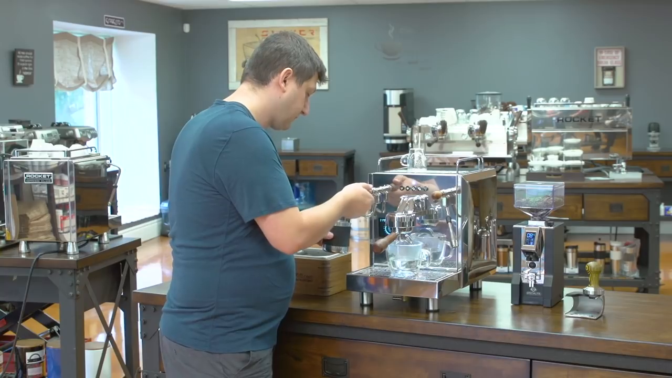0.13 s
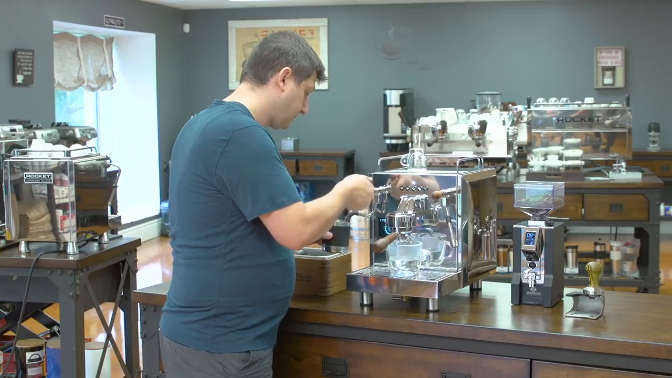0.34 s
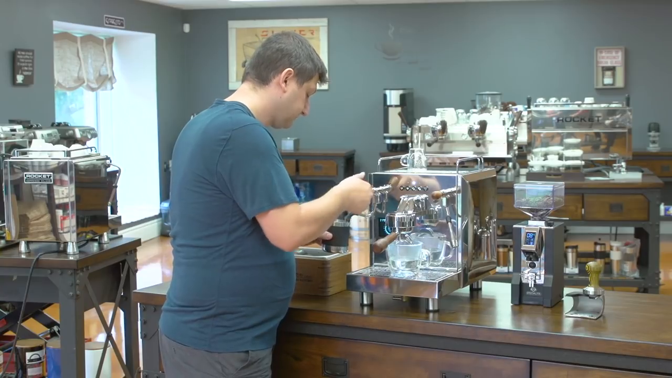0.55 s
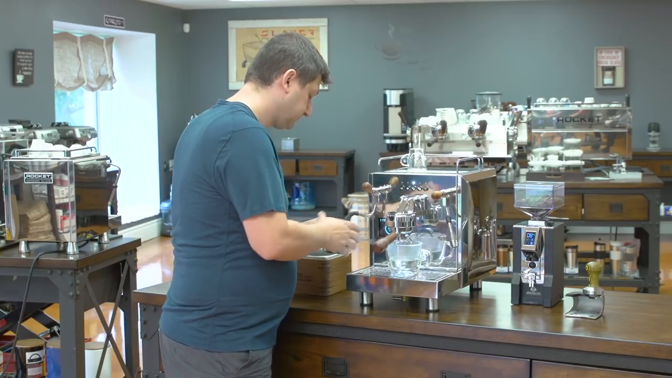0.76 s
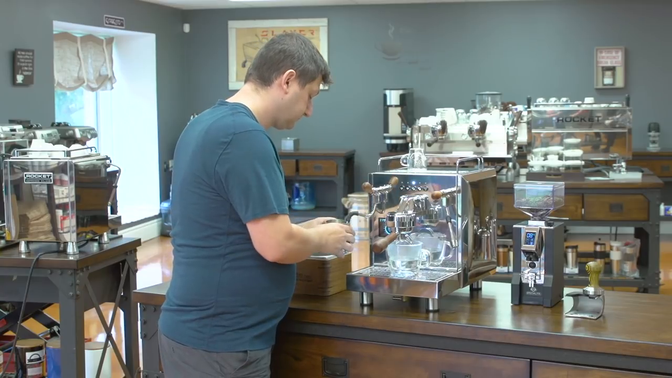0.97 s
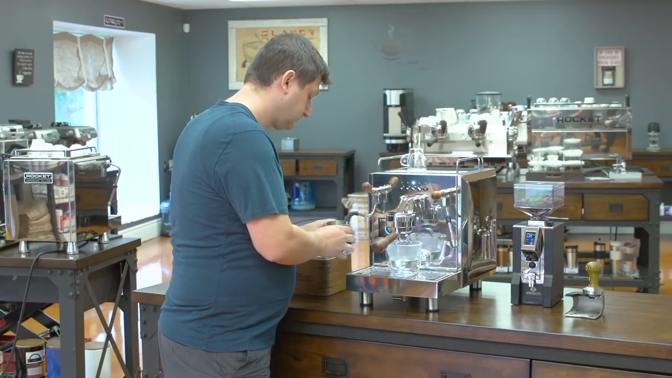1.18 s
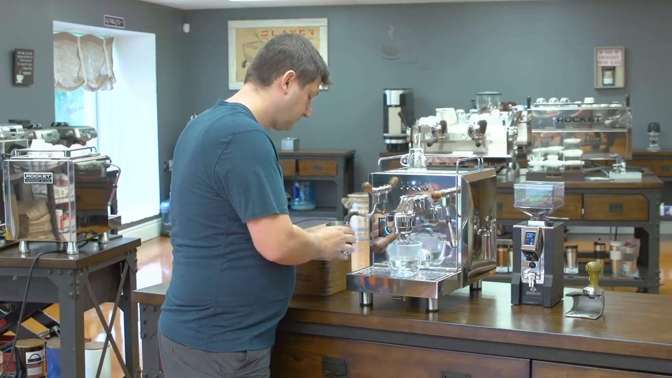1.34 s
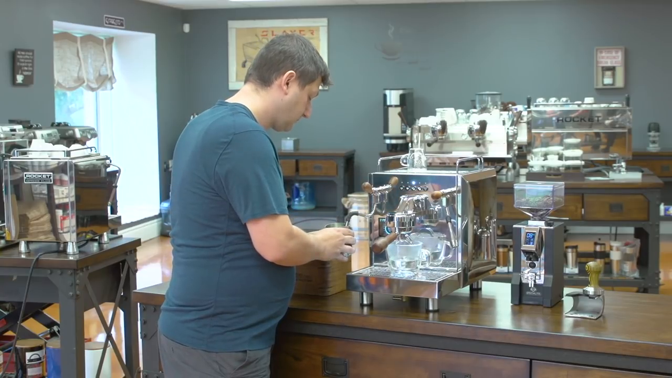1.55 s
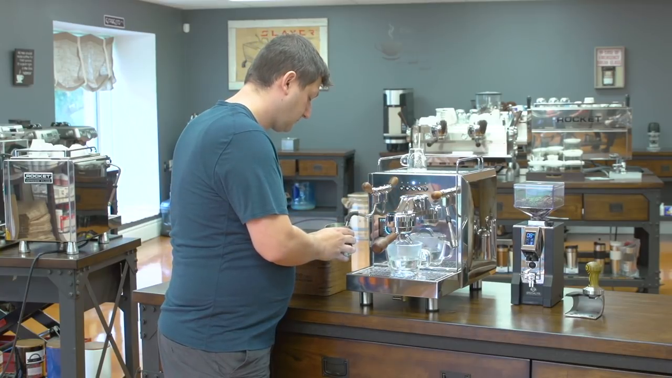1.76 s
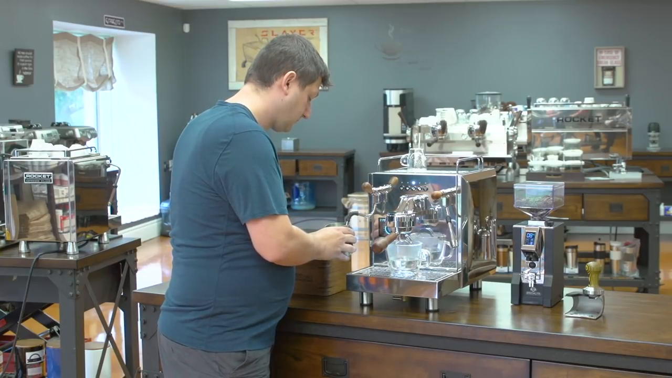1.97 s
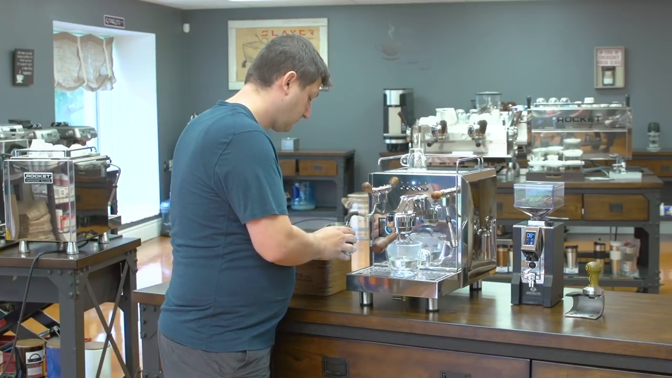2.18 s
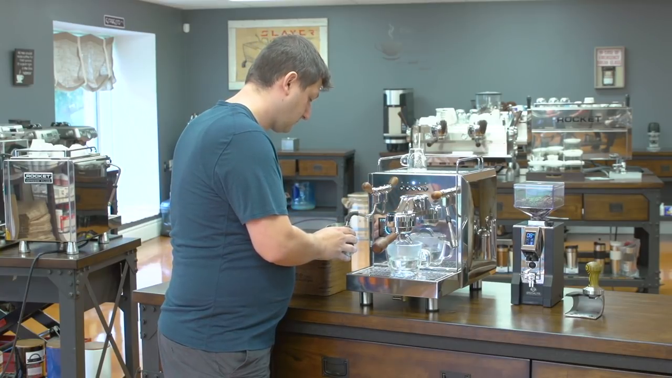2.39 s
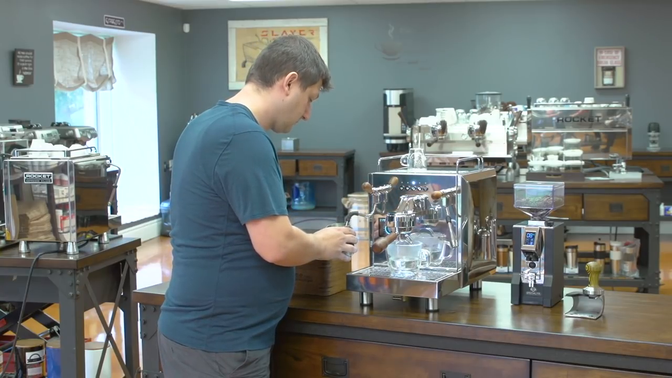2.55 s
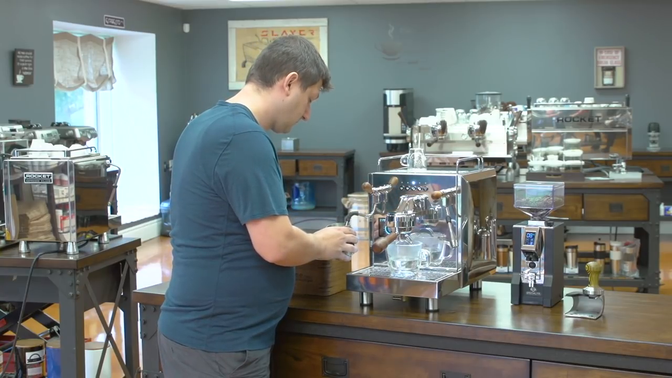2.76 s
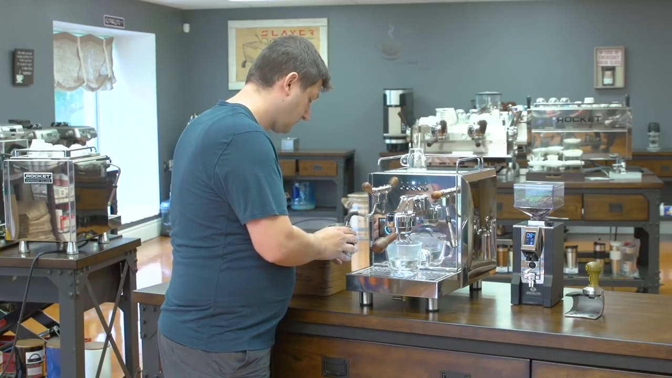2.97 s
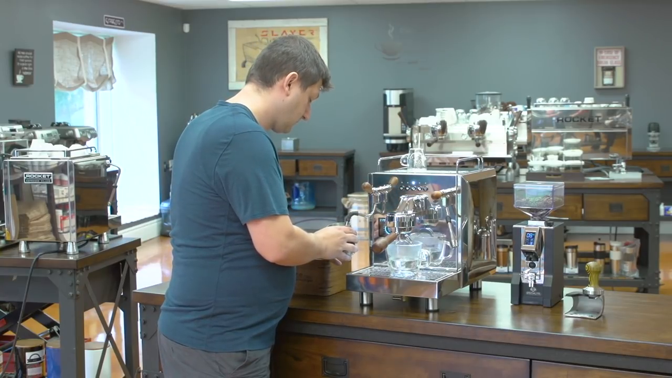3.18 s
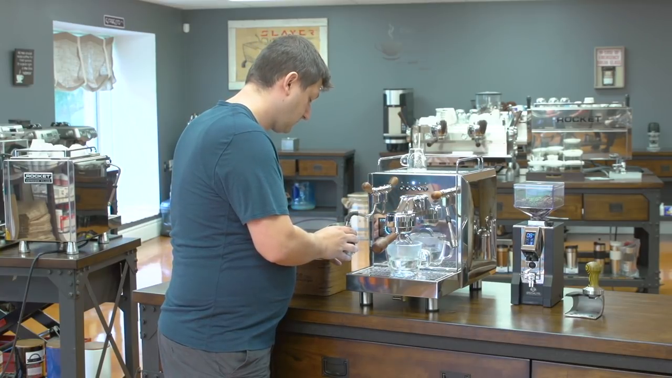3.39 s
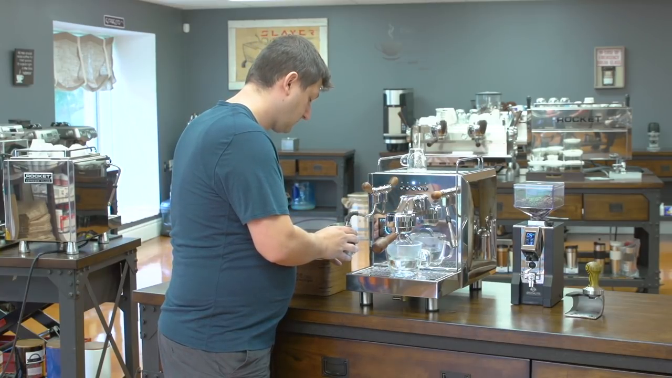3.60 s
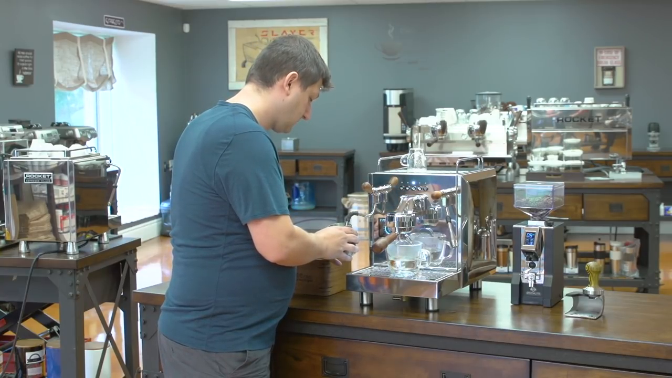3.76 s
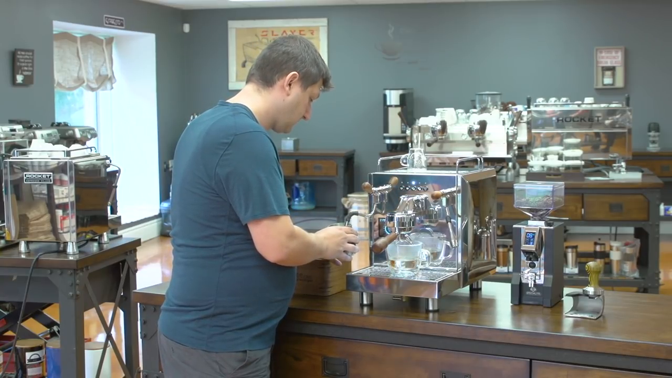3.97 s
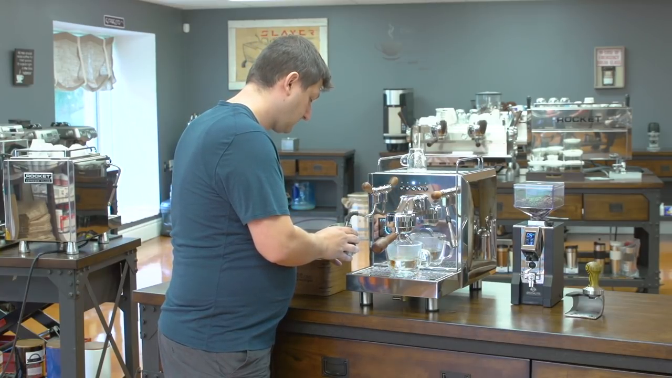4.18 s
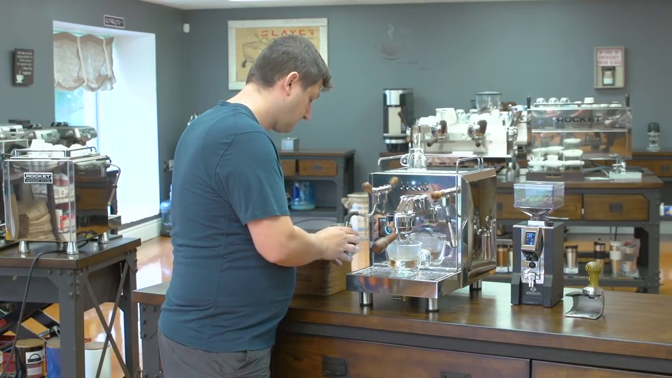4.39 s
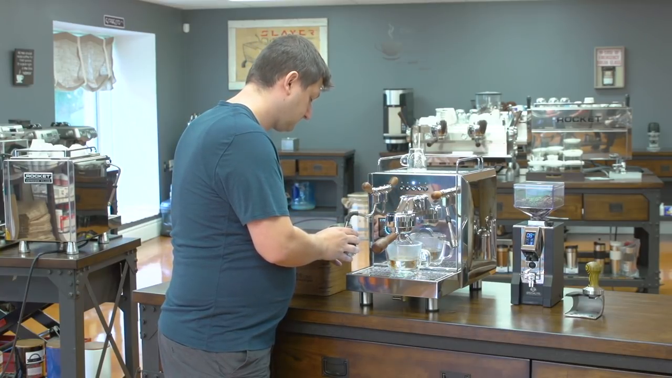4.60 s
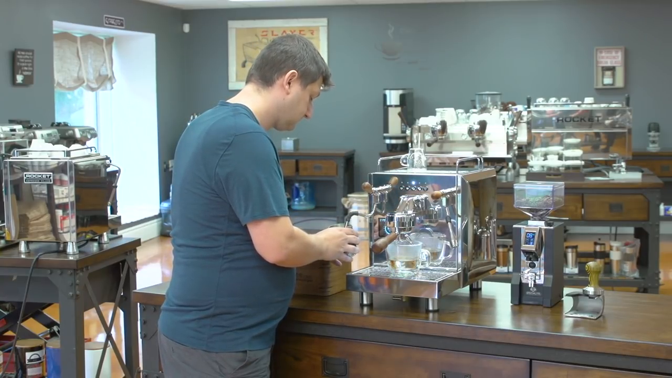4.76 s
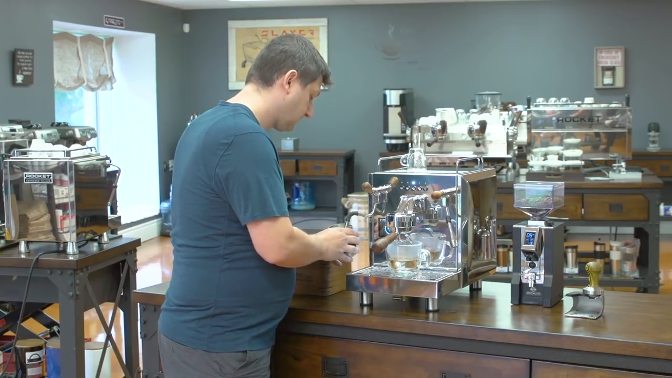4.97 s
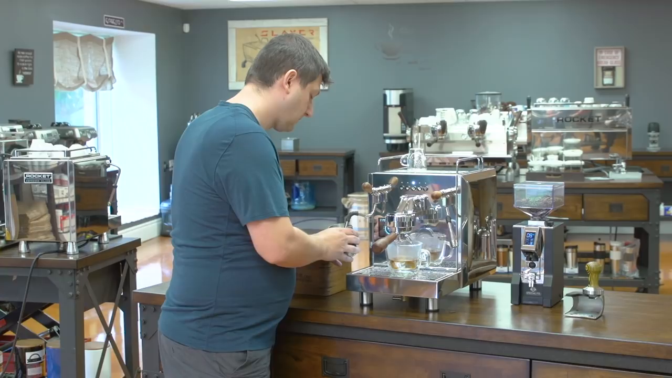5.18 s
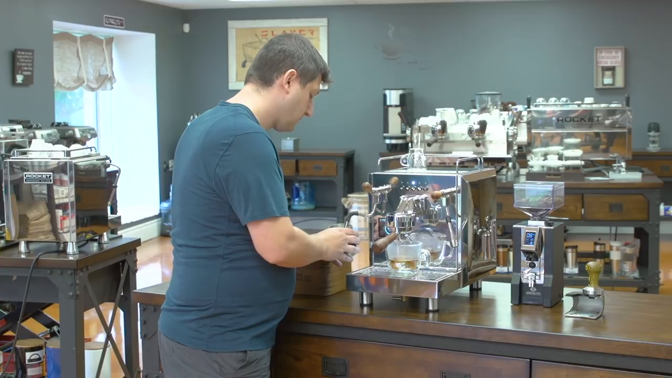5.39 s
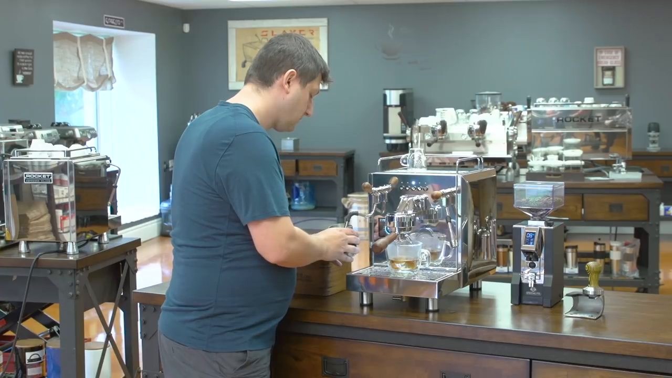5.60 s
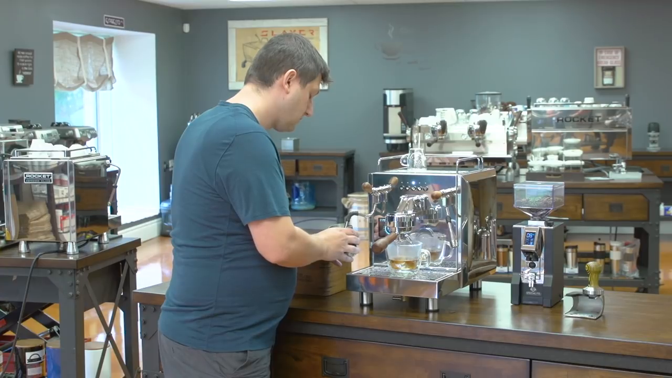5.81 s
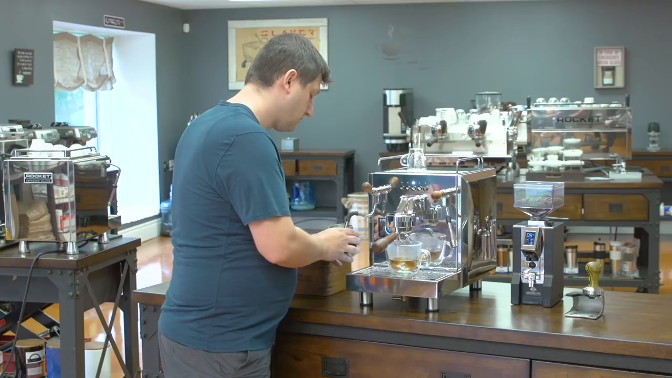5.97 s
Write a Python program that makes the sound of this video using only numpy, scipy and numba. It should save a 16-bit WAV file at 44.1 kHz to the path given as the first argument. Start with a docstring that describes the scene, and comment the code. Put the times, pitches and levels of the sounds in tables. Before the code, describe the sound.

In a quiet showroom, a barely open steam valve sings faintly over soft room rumble and hum. Two watery spits lead into a loud, high hiss with a rising hollow note inside the pitcher. It chokes into bubbling and metallic ringing, then raspy gulps of air and gurgles. Later a soft fizzing churn continues with scattered short rips. Heard fairly close, with little echo.

```python
"""A steam wand is opened into a pitcher of milk on an espresso machine in a quiet showroom.
The barely open valve sings and the tip spits condensate; then a jet hisses, sounds the hollow it blows
into the milk as two rising notes, and breaks into collapsing bubbles that ring the steel pitcher.
Whenever the tip reaches the surface it tears air in as a rattle of gulps that ring tiny bubbles.
Room rumble and hum lie beneath; a gain control pushes bubbles and room down under every loud hiss."""
import sys
import numpy as np
from scipy import signal
from scipy.fft import rfft, irfft
from scipy.io import wavfile
from scipy.ndimage import uniform_filter1d, minimum_filter1d
from numba import njit

SR = 44100
rng = np.random.default_rng(int(sys.argv[2]) if len(sys.argv) > 2 else 0)


def wrap_up_sound(samples):
    """Save the sound to the file named by the first command line argument, as 16-bit audio."""
    columns = np.atleast_2d(samples).T
    # keep every value between -1 and 1, then stretch to whole-number steps
    tamed = np.clip(columns, -1, 1)
    steps = np.round(tamed * 32767).astype(np.int16)
    wavfile.write(sys.argv[1], SR, steps)


N = 266540
TIME = np.arange(N) / SR
OPEN_S = 0.41  # the full flow reaches the tip


def amp(db):
    """Level law: 20 dB is a factor of ten in pressure."""
    return 10 ** (np.asarray(db) / 20)


def unit(x):
    """Normalisation to an rms of 1."""
    return x / np.sqrt(np.mean(x ** 2))


def ramp(start, length):
    """Linear onset: rises from 0 to 1 over `length` seconds."""
    return np.clip((TIME - start) / length, 0, 1)


def curves(table):
    """Linear interpolation in time of each column of a table."""
    seconds, *columns = np.transpose(table)
    return [np.interp(TIME, seconds, column) for column in columns]


def noise():
    """White noise: equal mean power in every hertz."""
    return rng.standard_normal(N)


def walk(rate):
    """Random modulation: straight lines between `rate` chance values a second; rms 1."""
    knots = rng.standard_normal(N // 10)
    return unit(np.interp(TIME * rate, np.arange(len(knots)), knots))


def flutter(rate, depth_db):
    """Random amplitude modulation: a gain of rms 1 that wavers in decibels."""
    return unit(amp(depth_db * np.clip(walk(rate), -2, 2)))


def collapses(rate, spread_db):
    """Shot noise: sharp pressure spikes of either sign and uneven size, `rate` a second; rms 1."""
    spikes = (rng.random(N) < rate / SR) * amp(spread_db * np.clip(noise(), -2, 2))
    return unit(spikes * np.sign(noise()))


def rattle(rate, decay, steady):
    """Relaxation after sudden puffs: each dies away exponentially, over a steady part; gain of rms 1."""
    chance = rng.random((N // 10, 2))
    gaps = (.15 + 1.7 * chance[:, 0]) * SR / rate
    at = np.cumsum(gaps).astype(int)
    inside = at < N
    puffs = np.bincount(at[inside], amp(4.7 * chance[inside, 1]), N)
    dying = signal.lfilter([1], [1, -np.exp(-1 / (decay * SR))], puffs)
    return unit(unit(dying) + steady)


def colour(x, points):
    """Minimum-phase filtering: a causal response with the given (Hz, dB) outline; rms 1."""
    hz, db = np.transpose(points)
    grid = np.maximum(np.fft.rfftfreq(2048, 1 / SR), 1)
    outline = amp(np.interp(np.log(grid), np.log(hz), db))
    cepstrum = irfft(np.log(outline))
    # folding the cepstrum onto positive time makes the response causal
    half = len(cepstrum) // 2
    cepstrum[1:half] *= 2
    cepstrum[half + 1:] = 0
    response = irfft(np.exp(rfft(cepstrum)))
    return unit(signal.fftconvolve(x, response)[:N])


@njit
def svf(x, hz, width):
    """State-variable resonance: a band-pass whose centre and width [Hz] may move."""
    y, band, low = np.empty(len(x)), 0., 0.
    for i in range(len(x)):
        g, k = np.tan(np.pi * hz[i] / SR), width[i] / hz[i]
        v = (band + g * (x[i] - low)) / (1 + g * (g + k))
        band, low, y[i] = 2 * v - band, low + 2 * g * v, k * v
    return y


def resonate(x, hz, width):
    """Cascaded resonance: two equal band-passes in series give steep skirts; rms 1."""
    hz, width = np.clip(hz, 20, .45 * SR) * np.ones(N), width * np.ones(N)
    return unit(svf(svf(x, hz, width), hz, width))


def jet():
    """Jet noise: the turbulent flow hisses, throws drops, sounds the hollow and faintly rings the pitcher."""
    # the open jet, which drowns as the tip sinks: (time [s], hiss level [dB], splatter level [dB])
    jet_levels = [(.42, -12, -19.5), (.62, -15, -15), (.85, -5, -15.5), (1.1, -3, -14.5), (1.3, -8.5, -15),
                  (1.6, -14.5, -24), (1.85, -8, -25), (2.0, -18.5, -19), (2.1, -37, -46),
                  (2.32, -21.5, -25), (2.5, -20.5, -51), (2.65, -20, -40), (3.0, -28.5, -30),
                  (3.4, -35, -42)]
    # outline of the hiss: (frequency [Hz], spectral level [dB per Hz])
    hiss_outline = [(700, -51), (2300, -19.5), (4500, -25.5), (6300, -19.5), (6750, 2), (8400, 6.5),
                    (9000, 0.5), (9500, -6), (10800, -12.5), (12000, -11.5), (14200, -29), (16000, -52)]
    ring_db = -26  # ring of the pitcher relative to the hiss
    flat, settle_s = 0.166, 0.294  # share by which the eddies start flat, time constant of their rise
    hiss_db, splatter_db = curves(jet_levels)
    hiss = colour(collapses(rate=16000, spread_db=-2.0), hiss_outline)
    # eddies shed at the holes of the tip sing faintly, rising as the jet gathers speed
    speed = 1 - flat * np.exp(-np.maximum(TIME - OPEN_S, 0) / settle_s)
    eddies = 0
    for hz in (6850, 7400, 7950, 8500):
        song = resonate(noise(), hz * speed * (1 + .025 * walk(30)), 330)
        eddies = eddies + song * flutter(rate=40, depth_db=3)
    hiss = unit(hiss + .75 * unit(eddies)) * rattle(rate=330, decay=.002, steady=1.3)
    splatter = pockets(splash(collapses(rate=7000, spread_db=2.5)), drift=.05, depth_db=3)
    blown = hiss + hollow() + amp(ring_db) * pitcher(noise())
    return ramp(OPEN_S, 0.03) * (amp(hiss_db) * blown + amp(splatter_db) * splatter)


def hollow():
    """Cavity resonance: the jet blows across the hollow it digs; two notes rise until the walls cave in."""
    # notes around the tip: (first frequency [Hz], rise in the first second [Hz], width [Hz],
    # level relative to the hiss once fully singing [dB], change on caving in [dB])
    hollow_notes = [(344, 606, 83, -20, -3), (1435, 362, 200, -10.5, 3.5)]
    dig_power, dig_s = 0.42, 0.38  # digs fast, then ever more slowly; time until it sings fully
    cave_s, cave_sag, recovery_s = 1.39, 0.24, 0.16  # caves in and sings flatter for a moment
    closing_s = 1.502  # the hollow starts to close
    depth = np.maximum(TIME - OPEN_S, 0) ** dig_power
    caved = ramp(cave_s, 0.027)
    # the walls sag at once, then the pitch recovers
    sag = cave_sag * caved * np.exp(-np.maximum(TIME - cave_s, 0) / recovery_s)
    notes = 0
    for first_hz, rise_hz, width, db, caved_db in hollow_notes:
        hz = (first_hz + rise_hz * depth) * (1 - sag) * (1 + 0.015 * walk(30.07))
        note = resonate(noise(), hz, width) * flutter(rate=22, depth_db=1.5)
        notes = notes + amp(db + caved_db * caved) * note
    return notes * (.5 + .5 * ramp(OPEN_S, dig_s)) * (1 - ramp(closing_s, 0.05))


def splash(x):
    """Impact noise: the colour of drops thrown against milk and steel."""
    # outline of the splatter: (frequency [Hz], spectral level [dB per Hz])
    splatter_outline = [(150, -33.5), (600, -5), (1200, 0), (2000, -9), (2500, -16), (3100, 4), (4000, 0.5),
                        (5200, 8), (6000, 5.5), (8000, 1)]
    # drops thrown inside the pitcher lose their finest treble
    top = signal.butter(3, 10500, fs=SR, output="sos")
    return unit(signal.sosfilt(top, colour(x, splatter_outline)))


def tearing():
    """Air entrainment: millisecond gulps rip in air and ring tiny bubbles. Also returns when it happens."""
    # the tip at the surface: (start [s], end [s], tearing level before the lift of the rip [dB],
    # pitch of the new foam bubbles [Hz])
    tears = [(1.585, 2, -15.5, 8850), (2.043, 2.051, -24, 9300), (2.059, 2.102, -13, 9030),
             (2.529, 2.752, -21, 8480), (2.772, 2.835, -20, 8170), (2.829, 2.917, -13.5, 8670),
             (3.006, 3.089, -9, 9930), (3.111, 3.117, -12.5, 9400), (3.154, 3.342, -15.5, 9480),
             (3.798, 3.826, -26.5, 7300), (3.832, 3.877, -24, 8660), (4.201, 4.208, -19, 7630),
             (4.739, 4.785, -19, 7900), (4.8, 4.894, -22.5, 7660), (4.94, 4.977, -18.5, 8120),
             (4.991, 5.007, -21.5, 8330), (5.029, 5.163, -21, 7940), (5.409, 5.474, -16, 8300),
             (5.542, 5.7, -16.5, 8100), (5.737, 5.84, -21, 8070), (5.911, 5.964, -18, 8000),
             (6.001, 6.05, -14.5, 8200)]
    # single drops snapping at the tip: (time [s], level before the lift of the rip [dB])
    drop_snaps = [(2.158, -24), (2.197, -37), (2.392, -20), (2.505, -17), (2.517, -19), (4.171, -29),
                  (4.379, -24), (4.92, -31)]
    # outline of the rip before its pitch filter: (frequency [Hz], spectral level [dB per Hz])
    tear_outline = [(150, -26), (500, -7), (1500, -37), (4700, -4), (5800, 2.5), (7000, 8.5), (9500, 6),
                    (11000, 3.5), (12500, 4), (13300, -13), (16000, -14)]
    # outline of the finest spray: (frequency [Hz], spectral level [dB per Hz])
    spray_outline = [(11000, -17), (13500, 2.5), (14800, -11.5), (16000, 0)]
    attack_s, release_s = 0.0029, 0.0034
    sputter_db, sputter_s = -15.5, 0.024  # foam crackles on after a tear: level relative to it, decay
    foam_hz, foam_db, foam_db_per_octave = 7900, 3.5, -20  # finer bubbles ring less
    rip_db, spray_db = 3, -0.5
    gain, surfaced = np.zeros((2, N))
    pitch_hz = np.full(N, float(foam_hz))
    for start, end, db, hz in tears:
        # the surface breaks fast and closes over a few milliseconds, beginning just before the end
        after = np.maximum(TIME - end + .002, 0)
        closing = np.exp(-after / release_s)
        sputter = amp(sputter_db) * np.exp(-after / sputter_s)
        gate = ramp(start, attack_s) * np.maximum(closing, sputter)
        gain = np.maximum(gain, amp(db) * gate)
        surfaced = np.maximum(surfaced, gate)
        pitch_hz[TIME >= start] = hz
    snaps = sum(amp(db) * (TIME >= s) * np.exp(-np.abs(TIME - s) / 0.0031) for s, db in drop_snaps)
    gulps = rattle(rate=310, decay=0.0046, steady=0.18)
    gulps = uniform_filter1d(gulps, size=32) * flutter(rate=35, depth_db=1.6)
    # finer foam moves the whole rip upwards
    rip = svf(colour(gulps * noise(), tear_outline), 1.25 * pitch_hz, np.full(N, 8000.))
    rip = wall_echo(rip, lag=0.000715, share=0.5)
    spray = amp(spray_db) * colour(gulps * noise(), spray_outline)
    ring = resonate(gulps * noise(), pitch_hz * (1 + 0.018 * walk(120)), 1000)
    foam = amp(foam_db + foam_db_per_octave * np.log2(pitch_hz / foam_hz)) * ring
    return amp(rip_db) * (gain + snaps) * rip + gain * (spray + foam), surfaced


def wall_echo(x, lag, share):
    """Comb filtering: the steel wall reflects the sound; the lag drifts as the pitcher is moved."""
    drift = 1 + .04 * walk(3)
    return unit(x + share * np.interp(TIME - lag * drift, TIME, x))


def boil():
    """Bubble collapse: clusters of big bubbles roll and churn, small ones fizz, and the pitcher rings."""
    # bubbles under the milk: (time [s], base level [dB], share rolling up as big pockets [0-1])
    boil_levels = [(1.4, -24, 1), (1.55, -26.5, 0.85), (1.66, -28, 0.27), (1.9, -29, 0.34),
                   (2.03, -21.5, 0.68), (2.11, -23, .95), (2.24, -22, 0.9), (2.52, -18.5, 0.57),
                   (2.6, -29.5, 0.14), (2.76, -24.5, 0.6), (2.87, -29, 0.08), (3.15, -27, 0.15),
                   (3.38, -30.5, 0.06), (3.6, -26, 0), (4.68, -27.5, 0.03), (4.85, -32.5, 0.2),
                   (5.3, -30, 0), (6.04, -31.5, 0)]
    # short swells and dips of the collapsing bubbles: (middle [s], length [s], change in level [dB])
    swells_and_dips = [(1.376, 0.048, 18), (1.576, 0.041, 5.5), (1.735, 0.076, -2), (2.66, .06, 4.5),
                       (2.964, 0.11, 4), (3.784, 0.036, 2.5), (4.934, 0.033, 0), (5.129, .05, 5.5),
                       (5.26, 0.077, 0.5), (5.392, 0.07, 4), (5.725, 0.065, 3), (5.906, .07, 0.5)]
    # outlines of big pockets, churning and small bubbles: (frequency [Hz], spectral level [dB per Hz])
    roll_outline = [(200, -55), (600, -22), (870, -1.5), (1070, 1.5), (1500, 5), (1950, 2.5), (2650, 5),
                    (3100, 0), (4200, -1), (5300, 2), (6200, -50), (9000, -33)]
    churn_outline = [(200, -28), (600, -9), (900, -8.5), (1060, 3), (1400, 6.5), (1700, 3), (2000, -7),
                     (2550, 5.5), (2900, -3.5), (4200, 0.5), (5000, -14), (8000, -39)]
    fizz_outline = [(2500, -27), (4400, -1.5), (4850, -7.5), (5300, -2), (6300, -4.5), (7150, 4),
                    (8000, -6), (9200, -8), (9800, -15), (11200, -22.5), (13000, -32), (16000, -59)]
    start_s, attack_s = 1.354, 0.063
    ring_db, damped_db = 7.5, -10  # ring relative to the bubbles; big pockets cushion it
    fizz_mid_db, fizz_follows = -23, 0.2  # fizz level, and the share of the level swings it follows
    muffle_s, muffle_db = 4.7, -1  # from here a cap of foam muffles the churning
    level_db, rolling = curves(boil_levels)
    for s, length, db in swells_and_dips:
        level_db = level_db + db * np.exp(-(2 * (TIME - s) / length) ** 2)
    roll = pockets(colour(collapses(rate=5000, spread_db=0.5), roll_outline), drift=0.042, depth_db=3.0)
    churn = colour(collapses(rate=4000, spread_db=2.5), churn_outline)
    body = amp(2.5) * np.sqrt(rolling) * roll + np.sqrt(1 - rolling) * churn
    body = body * rattle(rate=150, decay=0.0092, steady=0.73)
    fizz = colour(collapses(rate=9000, spread_db=2.5), fizz_outline)
    fizz = fizz * rattle(rate=200, decay=0.0066, steady=0.5) * flutter(rate=30, depth_db=1.6)
    # clusters of collapses strike the steel
    clusters = rattle(rate=120, decay=0.0034, steady=1.0) * flutter(rate=18, depth_db=2.0)
    ring = pitcher(clusters * collapses(rate=3000, spread_db=1))
    ring = amp(ring_db + damped_db * rolling) * ring
    fizz_db = fizz_mid_db + fizz_follows * (level_db - np.median(level_db))
    muffle = amp(muffle_db * ramp(muffle_s, 0.27))
    return ramp(start_s, attack_s) * (amp(level_db) * (muffle * body + ring) + amp(fizz_db) * fizz)


def pockets(x, drift, depth_db):
    """Volume resonance: steam pockets form and change size, so their notes slide and come and go."""
    out = 0
    for k, hz in enumerate(np.geomspace(1300, 8500, 11)):
        centre = hz * np.exp(drift * walk(35))
        sign = (-1) ** k
        out = out + sign * flutter(rate=45, depth_db=depth_db) * svf(x, centre, 6 * np.sqrt(centre))
    return unit(unit(out) + 0.43 * x)


def pitcher(x):
    """Modal resonance: the modes of the filled pitcher, wandering a little as the milk swirls."""
    # pitcher with milk: (frequency [Hz], width [Hz], level relative to the other modes [dB])
    modes = [(3185, 232, 3.5), (3492, 255, 0.5), (4286, 103, -9), (7460, 640, -39.5)]
    rise_per_s, listed_at_s = 0.013, 3.35  # the ring creeps up as the milk foams, through its listed pitch
    stretch = 1 + rise_per_s * (TIME - listed_at_s) + .01 * walk(12) + .017 * walk(110)
    return unit(sum(amp(db) * resonate(x, hz * stretch, width) for hz, width, db in modes))


def gurgles():
    """Volume resonance: a big steam pocket rings higher as it shrinks and lower as it swells."""
    # pockets in the milk: (start [s], end [s], first frequency [Hz], last frequency [Hz], level [dB])
    big_pockets = [(0.421, 0.475, 4530, 4700, -19), (.556, 0.596, 1550, 1960, -19),
                   (0.612, .71, 2200, 3340, -25), (0.638, 0.702, 970, 1240, -25),
                   (.59, .76, 5360, 6160, -23), (0.72, .744, 4370, 3650, -21.5),
                   (0.79, .863, 3760, 3460, -19.5), (2.17, 2.274, 3160, 2800, -16),
                   (2.405, 2.505, 2770, 3040, -14), (2.484, 2.547, 2620, 2180, -16),
                   (2.613, 2.709, 2550, 2570, -21), (2.708, 2.803, 2950, 2710, -23),
                   (2.923, 2.995, 2940, 2730, -22)]
    out = np.zeros(N)
    for start, end, first_hz, last_hz, db in big_pockets:
        span = slice(int(start * SR), int(end * SR))
        age = np.linspace(0, 1, len(out[span]))
        hz = first_hz + (last_hz - first_hz) * age
        width = 6 * np.sqrt(hz)
        ring = unit(svf(svf(noise()[span], hz, width), hz, width))
        out[span] += amp(db) * np.sqrt(np.abs(np.sin(np.pi * age))) * ring
    return out


def spits():
    """Transient resonance: each plug of water bursts out with a hollow note and a spray."""
    # plugs of condensate leaving the tip: (time [s], level [dB], decay [s], hollow note [Hz],
    # hiss relative to the note [dB])
    plugs = [(0.375, -17.5, 0.0066, 1000, -2.5), (0.387, -30, 0.073, 322, -1.5),
             (0.41, -19.5, 0.022, 1090, -24), (0.418, -33, 0.12, 378, -8)]
    out, spray = 0, splash(noise())
    for s, db, decay, hz, hiss_db in plugs:
        age = np.maximum(TIME - s, 0)
        burst = (1 - np.exp(-age / 0.0015)) * np.exp(-age / decay)
        note = resonate(noise(), hz, 0.59 * hz)
        out = out + amp(db) * burst * (note + amp(hiss_db) * spray)
    return out


def valve():
    """Flow-excited resonance: steam seeping through the barely open valve sings until the full flow."""
    # the singing valve: (frequency [Hz], width [Hz], rms level [dB])
    valve_notes = [(1050, 46, -56), (1230, 52, -54), (2286, 36, -57), (7620, 240, -48.5), (8640, 380, -52),
                   (12950, 300, -66), (13610, 110, -60)]
    # outline of the seeping steam: (frequency [Hz], spectral level [dB per Hz])
    seep_outline = [(100, 0), (250, 3.5), (900, 3), (1300, -1), (1600, -9.5), (3200, -5), (8500, -6),
                    (11500, -10.5), (14000, -6), (16000, -31)]
    song = sum(amp(db) * resonate(noise(), hz, width) for hz, width, db in valve_notes)
    tone = amp(-43) * np.sin(2 * np.pi * np.cumsum(1093 + 3 * walk(56)) / SR)
    seep = amp(-43) * colour(noise(), seep_outline)
    return (song + tone + seep) * (1 - ramp(OPEN_S, 0.037))


def room(x, t60, wet_db):
    """Reverberation: scattered echoes from counter, machines and walls decay by 60 dB in `t60` seconds."""
    t = TIME[:SR // 2]
    tail = rng.standard_normal(len(t)) * amp(-60 * t / t60) * (t > .002)
    tail = signal.sosfilt(signal.butter(2, 6000, fs=SR, output="sos"), tail)
    tail = tail / np.sqrt(np.sum(tail ** 2))
    return x + amp(wet_db) * signal.fftconvolve(x, tail)[:N]


def background():
    """Ambient noise: soft broadband rumble of the room and mains hum of the machines."""
    # outline of the rumble: (frequency [Hz], spectral level [dB per Hz])
    room_outline = [(20, -12), (50, 3), (90, 5.5), (190, -16), (240, 10.5), (320, -13), (420, -7.5),
                    (700, 8), (1500, -10), (6000, -45)]
    rumble_db, hum_db = -55, -56
    hum = np.sin(2 * np.pi * 120 * TIME) * flutter(rate=6, depth_db=1.5)
    return amp(rumble_db) * colour(noise(), room_outline) + amp(hum_db) * hum


@njit
def follow(x, attack, release):
    """Envelope detection: level of a signal, rising fast and falling slowly (times in s)."""
    out, level = np.empty(len(x)), 1e-9
    for i in range(len(x)):
        level += (abs(x[i]) - level) / (SR * (attack if abs(x[i]) > level else release))
        out[i] = level
    return out


def scene():
    """Superposition: the steam divides between jet, bubbles and torn air, heard in the room."""
    tear, surfaced = tearing()
    # with the tip at the surface, less steam collapses under the milk
    submerged = amp(-1.5 * surfaced)
    wand = valve() + spits() + gurgles() + jet() + submerged * boil() + tear
    # a small pitcher radiates hardly any bass
    wand = signal.sosfilt(signal.butter(2, 130, "high", fs=SR, output="sos"), wand)
    return (room(wand, t60=0.11, wet_db=-23) + background())[None]


def record(dry):
    """Dynamic compression: loud passages are turned down, a fast limiter holds peaks, the top is cut."""
    threshold_db, ratio, attack_s, release_s = -11.5, 3.15, 0.0012, 0.051
    ceiling, top_hz = .6, 15850
    over = np.maximum(follow(dry[0], attack_s, release_s) / amp(threshold_db), 1)
    held = dry * over ** (1 / ratio - 1)
    gain = minimum_filter1d(ceiling / np.maximum(np.abs(held), ceiling), size=200)
    limited = held * uniform_filter1d(gain, size=200)
    return signal.sosfilt(signal.ellip(10, .2, 80, top_hz, fs=SR, output="sos"), limited)


dry = scene()
out = record(dry)
wrap_up_sound(out)
```